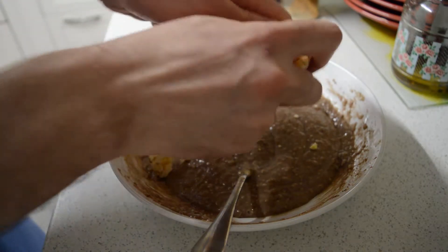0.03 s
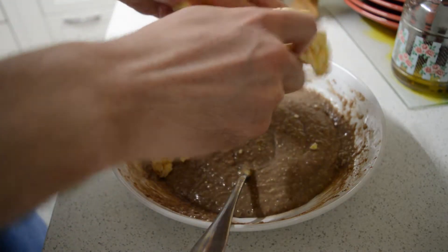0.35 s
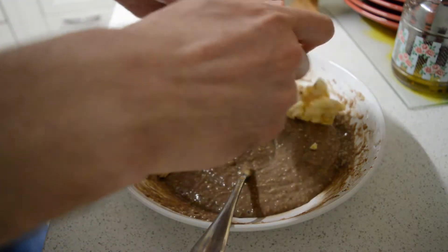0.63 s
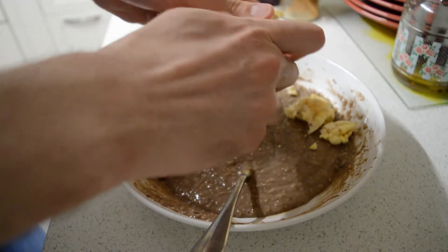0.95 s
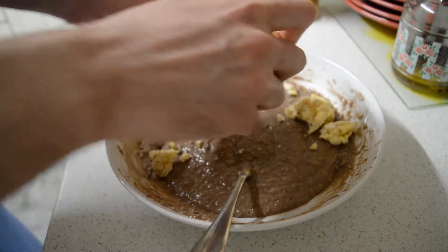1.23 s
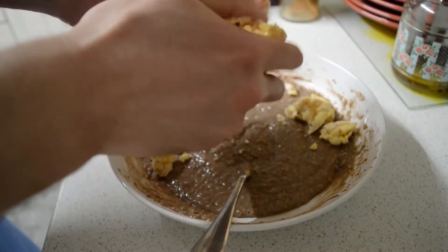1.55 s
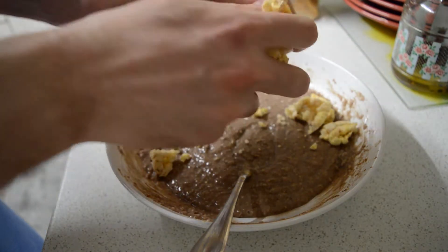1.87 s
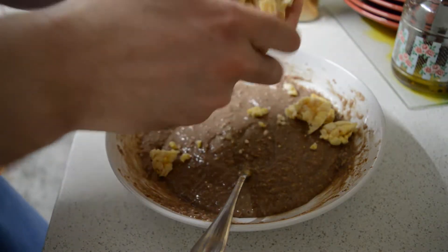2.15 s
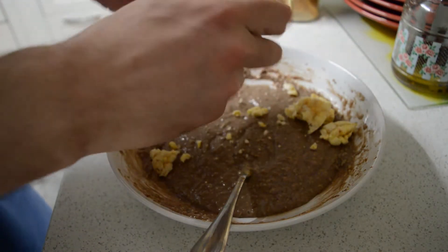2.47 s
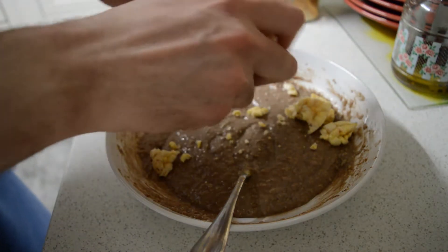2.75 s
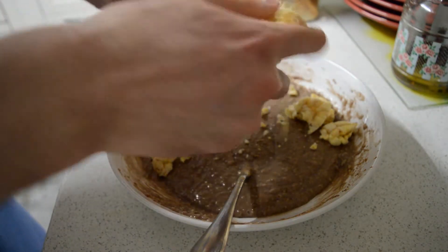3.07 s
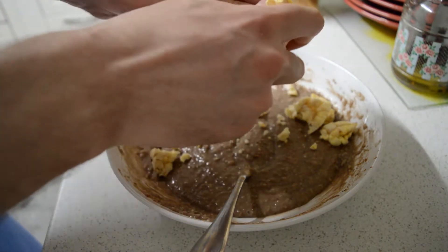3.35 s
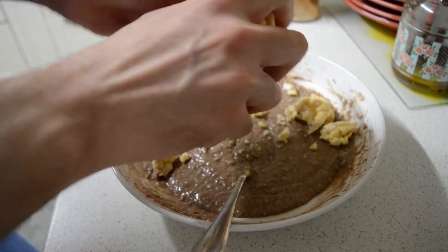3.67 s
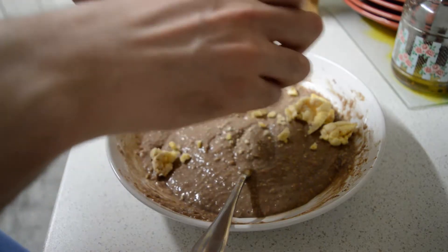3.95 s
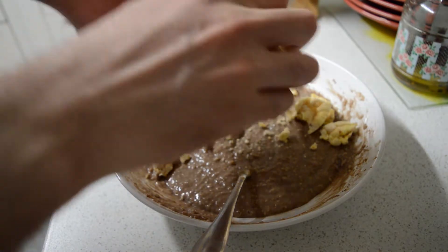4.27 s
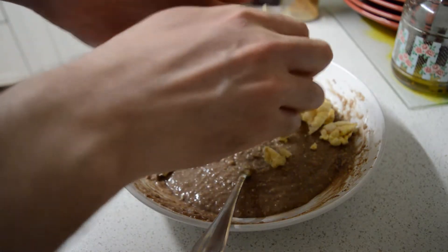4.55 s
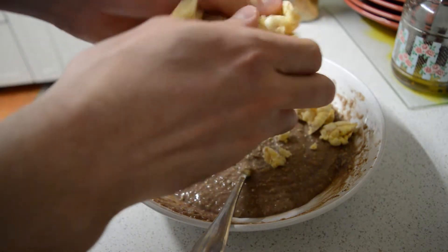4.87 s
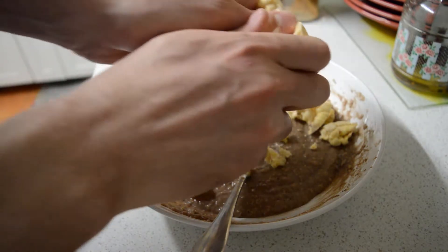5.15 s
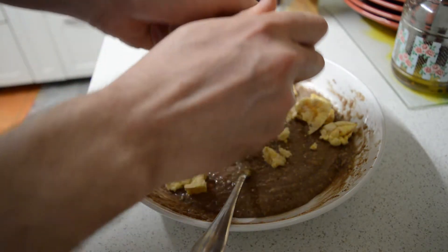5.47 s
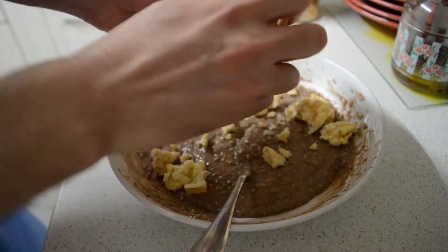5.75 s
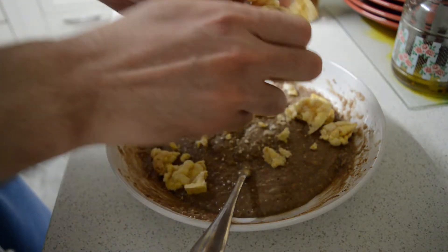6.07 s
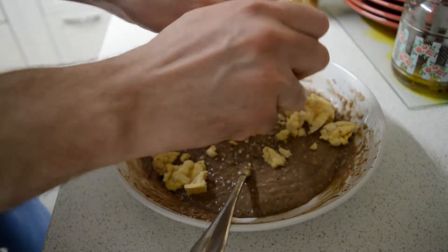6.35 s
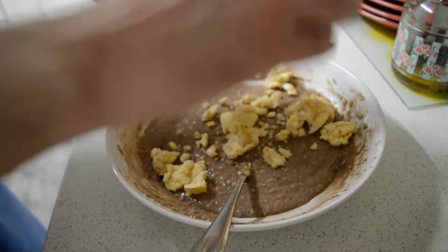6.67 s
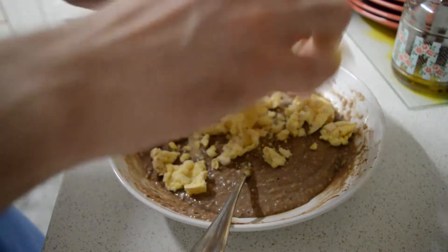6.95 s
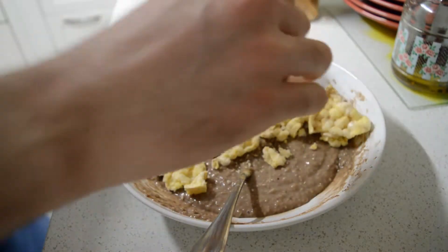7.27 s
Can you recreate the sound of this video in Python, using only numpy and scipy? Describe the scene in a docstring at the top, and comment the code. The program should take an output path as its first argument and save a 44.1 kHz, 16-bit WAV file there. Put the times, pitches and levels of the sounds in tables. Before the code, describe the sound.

Dry rice cakes crack and crunch as fingers snap them into pieces, the broken edges scraping together and shedding crumbs. The sharp little bursts ease off midway, then return more densely. Near the end a handful of light bits patters into a bowl of batter, making it ring very slightly. The sound is close and centred, over the faint steady hum of a small kitchen.

```python
"""Breaking rice cakes over a bowl

Two hands snap dry puffed rice cakes; each crack is an avalanche of bursting cell walls.
The broken faces grind, crumble and briefly squeak between the fingers, the arms rustle,
and the last pieces drop into a bowl of batter. A small kitchen with a faint hum, close, almost mono."""
import sys
import numpy as np
from scipy import signal
from scipy.fft import rfft, irfft, next_fast_len
from scipy.io import wavfile
from scipy.ndimage import uniform_filter1d

SR = 44100
rng = np.random.default_rng(int(sys.argv[2]) if len(sys.argv) > 2 else 0)


def dump_mix(stems):
    """Bounce the given channels to the path in sys.argv[1] as a 16-bit WAV at rate SR."""
    frames = np.atleast_2d(stems).T  # one column per channel
    limited = np.clip(frames, -1, 1)  # hard clip at full scale
    pcm = np.round(limited * 32767).astype(np.int16)
    wavfile.write(sys.argv[1], SR, pcm)


N = 322812
TIME = np.arange(N) / SR

# cake spectrum (frequency [Hz], density [dB])
CAKE_SPECTRUM = [(180, -46), (300, -24.5), (543, -17), (663, -12.5), (756, -12), (1240, -6), (1640, -8.5),
                 (1810, -6), (2070, -4), (4070, -0.5), (5300, -2.5), (7500, -4.5), (11100, -5.5),
                 (15500, -13)]


def from_db(db):
    """Decibels to gain."""
    return 10 ** (np.asarray(db) / 20)


def unit_rms(x):
    """Scale to rms 1."""
    return x / np.sqrt(np.mean(x ** 2) + 1e-20)


def unit_energy(x):
    """Scale to energy 1."""
    return x / np.sqrt(np.sum(x ** 2) + 1e-20)


def per_sample(rows):
    """Interpolate each column over the first, time [s]."""
    times_s, *columns = np.transpose(rows)
    return [np.interp(TIME, times_s, column) for column in columns]


def db_at(spectrum, hz):
    """Interpolate a spectrum over log frequency."""
    known_hz, level_db = np.transpose(spectrum)
    return np.interp(np.log(hz), np.log(known_hz), level_db)


def add(out, start_s, x):
    """Mix x into out from start_s."""
    i = max(0, int(start_s * SR))
    out[i:i + len(x)] += x[:max(0, N - i)]


def bump(hz, centre_hz, width_hz):
    """Resonance curve of height 1."""
    return 1 / (1 + (2 * (hz - centre_hz) / width_hz) ** 2)


def colour(x, gain_db, size=2048):
    """Minimum-phase filter with response gain_db(hz)."""
    hz = np.maximum(np.arange(size // 2 + 1) * SR / size, 1)
    cepstrum = irfft(np.log(from_db(gain_db(hz))))
    cepstrum[1:size // 2] *= 2
    cepstrum[size // 2 + 1:] = 0
    response = irfft(np.exp(rfft(cepstrum)))
    count = next_fast_len(len(x) + size, True)
    return irfft(rfft(x, count) * rfft(response, count), count)[:len(x)]


def piece_db(hz, ring_hz, ring_db, body_db, crisp_db):
    """Response of one piece: cake spectrum, broad ring, hollow body, crisp top."""
    ring = ring_db * bump(hz, ring_hz, 0.51 * ring_hz)
    low_shelf = body_db / (1 + (hz / 1900) ** 6)
    high_shelf = crisp_db / (1 + (6800 / hz) ** 8)
    return db_at(CAKE_SPECTRUM, hz) + ring + low_shelf + high_shelf


def grains(per_s, spread_db, count):
    """Random clicks, as of bursting cell walls: mostly tiny, a few large."""
    sizes = from_db(spread_db * np.minimum(rng.exponential(1, count), 4))
    return sizes * rng.choice([-1, 1], count) * (rng.random(count) < per_s / SR)


def background(noise_db=-67, side_db=-16.5):
    """Steady noise, with a faint stereo rumble and high hiss for width; mains and appliance hum."""
    # steady centred noise (frequency [Hz], density [dB])
    mid_spectrum = [(25, -23), (50, -6.5), (80, -3.5), (160, -2), (300, -2), (480, -3), (680, -6),
                    (1100, -7.5), (2000, -12), (5000, -21.5), (9000, -20), (16000, -18)]
    # faint stereo rumble and high hiss (frequency [Hz], density [dB])
    side_spectrum = [(18, -38), (30, -6), (123, 7), (479, 4.5), (808, 2), (1510, -15.5), (3880, -22),
                     (4660, -21.5), (15500, -3)]
    # hum lines (frequency [Hz], rms [dB])
    hum_lines = [(48.6, -80), (57.5, -85), (157, -81.5), (290.5, -80.5), (656.5, -78.5)]
    mid = unit_rms(colour(rng.standard_normal(N), lambda hz: db_at(mid_spectrum, hz), size=8192))
    side = unit_rms(colour(rng.standard_normal(N), lambda hz: db_at(side_spectrum, hz), size=8192))
    hum = sum(from_db(db) * np.sqrt(2) * np.sin(2 * np.pi * (hz * TIME + rng.random()))
              for hz, db in hum_lines)
    return hum + from_db(noise_db) * (mid + from_db(side_db) * side * np.array([[1], [-1]]))


def friction_db(attack_s=0.0097, swell_db=1, release_s=0.01, ease_db=-7.5):
    """Grinding level: a steady hold, rubs that press harder as they go, dips at each new grip."""
    # rustle of the held cake (time [s], level [dB])
    hold = [(0.0, -48.5), (0.39, -54), (0.55, -50), (1.1, -48), (1.26, -45.5), (1.36, -46.5), (2.06, -50.5),
            (2.47, -48), (2.71, -49), (2.89, -52), (3.16, -52.5), (3.59, -51.5), (4.03, -53), (4.85, -51.5),
            (5.32, -44.5), (6.32, -47), (6.67, -58.5), (7.32, -78.5)]
    # faces rubbed together (start [s], length [s], level [dB])
    rubs = [(0, 0.041, -50.5), (0.088, 0.11, -51), (0.264, 0.072, -48.5), (0.373, 0.14, -46),
            (0.539, 0.14, -47), (0.694, 0.074, -48), (0.834, 0.072, -45.5), (1.051, 0.11, -46),
            (1.295, 0.12, -37), (1.502, 0.029, -42.5), (1.583, 0.24, -50.5), (1.954, 0.088, -47),
            (2.17, 0.076, -48.5), (2.286, 0.17, -45.5), (2.474, 0.059, -39), (2.651, 0.22, -48.5),
            (3.112, 0.044, -54), (3.216, 0.097, -49.5), (3.42, 0.023, -48), (3.556, .1, -48.5),
            (3.716, 0.03, -48.5), (3.905, 0.025, -46), (4.243, 0.12, -52.5), (4.476, 0.06, -51.5),
            (4.603, 0.028, -46.5), (4.754, 0.19, -51), (5.038, 0.26, -49.5), (5.535, 0.031, -40.5),
            (5.67, 0.1, -42.5), (5.804, 0.092, -49), (6.015, 0.12, -46.5), (6.22, 0.073, -52.5),
            (6.345, .12, -49.5), (6.578, 0.071, -58)]
    # fingers easing off (centre [s], length [s])
    pauses = [(0.328, 0.017), (.535, 0.039), (0.949, .09), (1.265, 0.069), (1.468, 0.05), (1.535, 0.021),
              (2.576, 0.049), (3.041, .1), (3.347, 0.048), (3.51, 0.16), (3.834, 0.033), (4.148, 0.058),
              (5.485, 0.045), (5.594, 0.021), (5.992, 0.055), (6.308, 0.037), (6.792, 0.23)]
    power = from_db(per_sample(hold)[0] - 1.5) ** 2
    for start_s, length_s, level_db in rubs:
        t = TIME[:int((length_s + 10 * release_s) * SR)]
        press_db = swell_db * (np.minimum(t / length_s, 1) - 0.5)
        envelope = np.minimum(t / attack_s, 1) * np.exp(-np.maximum(t - length_s, 0) / release_s)
        add(power, start_s, (from_db(level_db - 0.16 + press_db) * envelope) ** 2)
    easing = np.zeros(N)
    for centre_s, length_s in pauses:
        add(easing, centre_s - length_s / 2, signal.get_window("hann", int(length_s * SR)))
    return 10 * np.log10(power) + ease_db * easing


def grinding(level_db, crumb_s=0.0017, size=1024):
    """Rough faces scrape and shed crumbs, each a tiny burst; more pressure sheds more."""
    # colour of the gripped piece (time [s], ring [Hz], body [dB], crisp [dB])
    grips = [(0.05, 5150, -1, 0.5), (0.45, 4060, 1, -1.5), (1.36, 3900, -1, 1), (1.8, 3150, 1, 0),
             (2.05, 4240, -1, -4), (2.25, 3730, -7.5, -2.5), (2.63, 5200, -7, -5), (2.95, 5300, 2.5, 1),
             (3.3, 5300, 0.5, 0.5), (3.7, 4400, -1.5, 0), (4.35, 5600, 1, 1), (4.85, 3960, -1, 3),
             (5.09, 3900, 4, 0.5), (5.45, 5140, -6, 1.5), (5.85, 3200, 0.5, -1.5), (6.1, 4640, 0, 1),
             (6.33, 2750, -5, 2), (6.6, 4750, -1, -0.5)]
    per_s = 380 * from_db(0.29 * (level_db + 51))
    bursts = grains(per_s, spread_db=3.5, count=N) ** 2 / per_s
    crumb_power = signal.lfilter([1], [1, -np.exp(-1 / (crumb_s * SR))], bursts + 1e-18)
    roughness = np.sqrt(crumb_power / crumb_power.mean() + 0.17)
    rasp = roughness * grains(per_s=22000, spread_db=1.7, count=N)
    local_rms = np.sqrt(uniform_filter1d(rasp ** 2, size=1200) + 1e-9)
    rasp = rasp / local_rms * from_db(level_db - 1.64)
    out, window, grip = np.zeros(N), signal.get_window("hann", size), per_sample(grips)
    for i in range(0, N - size, size // 2):
        ring_hz, body_db, crisp_db = (curve[i] for curve in grip)
        ring_hz *= 2 ** rng.normal(0, 0.15)
        body_db += rng.normal(0, 3.6)
        crisp_db += rng.normal(0, 2.0)
        frame = np.pad(rasp[i:i + size] * window, (0, size // 2))
        shaped = colour(frame, lambda hz: piece_db(hz, ring_hz, 3.9, body_db, crisp_db), size=512)
        add(out, i / SR, unit_energy(shaped) * np.sqrt(np.sum(frame ** 2)))
    return out


def cracks(fractures, ring_db=8.1, size=1024):
    """Each crack is a dying avalanche of cell walls, coloured by the piece it frees."""
    out, t = np.zeros(N), TIME[:size]
    for start_s, level_db, ring_hz, body_db, crisp_db, run_s in fractures:
        progress = t / max(run_s, 2e-4)
        onset = 1 - np.exp(-6 * progress - 0.6)  # long cracks gather speed slowly
        stray_cells = 0.16 * np.exp(-t / 0.0032)
        envelope = onset * (np.exp(-progress) + stray_cells)
        avalanche = grains(per_s=22000, spread_db=3.5, count=size) * envelope
        # flatten the broad trend, keep the fine ripple
        power = np.abs(rfft(avalanche, 2048)) ** 2
        trend_db = 10 * np.log10(uniform_filter1d(power, size=70) + 1e-12)
        crack = colour(avalanche,
                       lambda hz: piece_db(hz, ring_hz, ring_db, body_db - 0.5, crisp_db + 0.5) - trend_db)
        add(out, start_s - 0.0002, from_db(level_db + 26) * unit_energy(crack))
    return out


def snaps():
    """The cake breaks in clusters of cracks."""
    # main fractures (time [s], level [dB], ring [Hz], body [dB], crisp [dB], run time [s])
    fractures = [(0.1308, -28, 4570, -6, -0.5, 0.0014), (0.3987, -39.5, 3480, -2, -3, 0.0039),
                 (0.6471, -40, 2220, 8, 2.5, 0.0012), (0.716, -41, 3380, -4, 1, 0.005),
                 (1.0448, -41.5, 3300, -1, 9, 0.00059), (1.069, -29, 4550, -6.5, 4.5, 0.0023),
                 (1.1148, -28, 1580, 6.5, 0.5, 0.00099), (1.1522, -41, 3000, -14, 3, 0.0032),
                 (1.217, -42, 4670, -4, 8, .0034), (1.2923, -41, 4300, -7, 8, .0017),
                 (1.3032, -32, 3750, -2, -2, 0.002), (1.3366, -31, 2240, 4.5, -2, 0.0022),
                 (1.45, -44.5, 6100, 13.5, 6, 0.0013), (1.745, -46, 3200, 3, -2, 0.0033),
                 (1.959, -42.5, 3120, 0, -10, 0.0037), (2.299, -37, 3100, -2, -1.5, 0.00078),
                 (2.3253, -35.5, 5400, 2, 1, 0.00088), (2.3533, -27, 4700, -5.5, -3.5, 0.0017),
                 (2.3819, -25, 4540, 0, 0.5, 0.0017), (2.389, -31.5, 3680, -8, -2, .001),
                 (2.412, -35.5, 4450, -2, 0, 0.0025), (2.4527, -40, 2600, -3, -5, 0.0011),
                 (2.495, -41, 5100, 1, 9, .002), (2.5048, -33, 4700, -1.5, 3, 0.001),
                 (2.5837, -38.5, 5100, -2, -2.5, 0.00054), (2.7834, -33.5, 3750, 4.5, 10.5, 0.0018),
                 (2.912, -39, 4750, 5, 14, 0.00076), (3.4214, -33, 3920, -1.5, 3.5, 0.00032),
                 (3.5206, -42.5, 4040, 1, 1, .005), (3.719, -46.5, 4000, 11, -2, 0.0025),
                 (4.7764, -42.5, 4800, 7.5, 5, 0.0038), (5.007, -38.5, 3580, 4.5, -2, 0.00072),
                 (5.0448, -41, 4270, -2, 1, 0.00074), (5.141, -33, 4140, 10, 2.5, 0.0026),
                 (5.1727, -30.5, 2280, 3, -3, .0015), (5.2335, -32.5, 1560, 2.5, -4, 0.001),
                 (5.2405, -36.5, 5300, -19, 7, .0012), (5.251, -39, 4080, -5, 8, 0.0046),
                 (5.2751, -31.5, 5260, 0.5, -2, 0.0023), (5.2902, -43.5, 5000, 1, 1, 0.001),
                 (5.3339, -29.5, 3080, 2.5, 3, 0.00054), (5.346, -35, 3080, -5, 11, .004),
                 (5.3692, -36.5, 3130, 2, 1, 0.0013), (5.39, -40, 4000, 4.5, -19, .003),
                 (5.4165, -38.5, 6200, 0, 3, 0.00099), (5.43, -37, 6000, -4, 6, .0015),
                 (5.4421, -27, 3430, -12, -6, 0.00054), (5.5018, -38, 3230, 4, -3, 0.00085),
                 (5.508, -36, 5740, -5, 11, 0.00088), (5.5176, -37, 3400, 2.5, 5, .0023),
                 (5.6557, -34, 4270, -3, 0, 0.0017), (5.685, -50, 4800, -10, -6, 0.0023),
                 (5.7052, -31.5, 4860, -3, 7, 0.0031), (5.922, -38, 3800, -11, -12, .002),
                 (6.066, -41.5, 5400, -9, 3, .0024), (6.163, -42.5, 2560, -16, -2, 0.0038),
                 (6.3157, -42, 3000, -7, -2, .0009), (6.3479, -35.5, 2700, -2.5, -4.5, 0.0019),
                 (6.3962, -40, 2700, -7, 1, .0024)]
    return cracks(fractures)


def chips(grind_db, per_s=8, spread_db=4, limit_db=-43, count=256):
    """Small chips crack off at random; their level follows the grinding."""
    times_s = np.cumsum(rng.exponential(1, count)) / per_s
    levels_db = np.minimum(np.interp(times_s, TIME, grind_db) + rng.normal(1, spread_db, count), limit_db)
    pitch, body, crisp, run = rng.standard_normal((count, 4)).T
    ring_hz = 4300 * 2 ** (0.32 * pitch)
    body_db, crisp_db = -3.5 + 1.5 * body, 0.5 + 1.5 * crisp
    run_s = 0.00083 * 2 ** run
    fractures = np.column_stack([times_s, levels_db, ring_hz, body_db, crisp_db, run_s])
    return cracks(fractures[times_s < TIME[-1]])


def squeaks():
    """Uneven stick-slip drives one narrow resonance of the piece."""
    # stick-slip bouts (start [s], rms [dB], pitch [Hz], length [s])
    bouts = [(1.6, -53.5, 3150, 0.11), (6.27, -46.5, 2750, 0.021), (6.319, -46.5, 2850, 0.042),
             (6.35, -59, 2800, 0.041)]
    out = np.zeros(N)
    for start_s, level_db, pitch_hz, length_s in bouts:
        count = int(length_s * SR)
        slips = grains(per_s=6300, spread_db=5.5, count=count)
        tone = signal.lfilter(*signal.iirpeak(pitch_hz, Q=16, fs=SR), slips)
        add(out, start_s, from_db(level_db) * unit_rms(tone * signal.get_window("hann", count)))
    return out


def arms(band_hz=(140, 280)):
    """A muffled rustle swells and fades as the arms move."""
    # arm movements (start [s], rms at crest [dB], length [s])
    shifts = [(4.048, -73, 0.58), (4.982, -69, 0.24), (5.305, -71, 0.28)]
    band = signal.butter(2, band_hz, "band", fs=SR, output="sos")
    rustle = unit_rms(signal.sosfilt(band, rng.standard_normal(N)))
    envelope = np.zeros(N)
    for start_s, level_db, length_s in shifts:
        add(envelope, start_s, from_db(level_db) * signal.get_window("hann", int(length_s * SR)))
    return envelope * rustle


def drops(contact_s=0.0027, knock_s=0.0033, size=8192):
    """Light pieces land with a pat, a knock and a dry tick, and ring the bowl a little."""
    # landings (time [s], level [dB], knock [Hz], tick trim [dB])
    landings = [(5.08, -32, 566, -7), (6.581, -37.5, 4840, -16), (6.619, -35, 5330, -17),
                (6.625, -38.5, 1230, -15), (6.812, -38, 790, -15.5), (6.906, -47, 4100, -8),
                (6.946, -39.5, 1400, -10.5), (6.973, -50.5, 1610, 2), (6.98, -40.5, 1900, -8),
                (6.996, -35, 2880, -12), (7.049, -29, 2060, -15), (7.056, -38, 1880, -12),
                (7.073, -37, 2020, -9), (7.118, -36, 1150, -20.5)]
    # bowl modes, damped by batter (frequency [Hz], level [dB], t60 [s])
    modes = [(693, -4, 0.17), (1093, -4, 0.11), (1410, -9, 0.059), (1990, 6, 0.034), (2210, 6, 0.016),
             (3030, 7, 0.026), (4200, -17, 0.023)]
    out, t = np.zeros(N), TIME[:size]
    for start_s, level_db, knock_hz, tick_db in landings:
        strengths = from_db(rng.normal(0, 1.4, len(modes))) * rng.choice([-1, 1], len(modes))
        bowl = sum(gain * from_db(db - 60 * t / t60_s) * np.sin(2 * np.pi * hz * t)
                   for gain, (hz, db, t60_s) in zip(strengths, modes))
        contact = rng.standard_normal(size) * np.exp(-t / contact_s)
        pat_band = signal.butter(2, [0.3 * knock_hz, 1.68 * knock_hz], "band", fs=SR, output="sos")
        pat = signal.sosfilt(pat_band, contact)
        knock = np.sin(2 * np.pi * knock_hz * t) * np.exp(-t / knock_s)
        tick = colour(contact, lambda hz: db_at(CAKE_SPECTRUM, hz))
        parts = [(bowl, -1), (pat, 5), (knock, 1.5), (tick, tick_db + 22.5)]
        add(out, start_s + 0.001246, sum(from_db(level_db + db) * unit_energy(x) for x, db in parts))
    return out


def kitchen(x, near_db=-8.5, near_s=0.0065, room_db=-15, t60_s=0.36, size=9000, block=1800):
    """Early reflections off hands, bowl and counter, then a short room tail."""
    # cavities of bowl and hands (centre [Hz], width [Hz], gain [dB])
    hollows = [(665, 42, 4.5), (1260, 53, 1.5), (1664, 300, 5.5), (1772, 156, -5.5), (4440, 430, -2.5),
               (5450, 530, 3), (7060, 1600, -2)]
    t, wet = TIME[:size], np.zeros(N)
    near = unit_energy(np.exp(-t / near_s) * (t > 0.002))
    tail = unit_energy(from_db(-60 * t / t60_s) * (t > 0.006))
    decay = np.hypot(from_db(near_db) * near, from_db(room_db) * tail)
    for i in range(0, N, block):  # moving hands: new echoes each block
        echoes = rfft(decay * rng.standard_normal(size), size + block)
        add(wet, i / SR, irfft(rfft(x[i:i + block], size + block) * echoes))
    wet = signal.sosfilt(signal.butter(1, 11000, fs=SR, output="sos"), wet)
    return colour(x + wet, lambda hz: sum(db * bump(hz, centre, width) for centre, width, db in hollows))


def scene():
    """Cake and arms close and centred, over the steady background."""
    grind_db = friction_db()
    cake = snaps() + chips(grind_db) + grinding(grind_db) + squeaks() + drops()
    return kitchen(cake) + arms() + background()


def record(dry):
    """Steep low-pass at 16 kHz."""
    return signal.sosfilt(signal.ellip(10, 0.1, 80, 16000, fs=SR, output="sos"), dry)


dry = scene()
out = record(dry)
dump_mix(out)
```